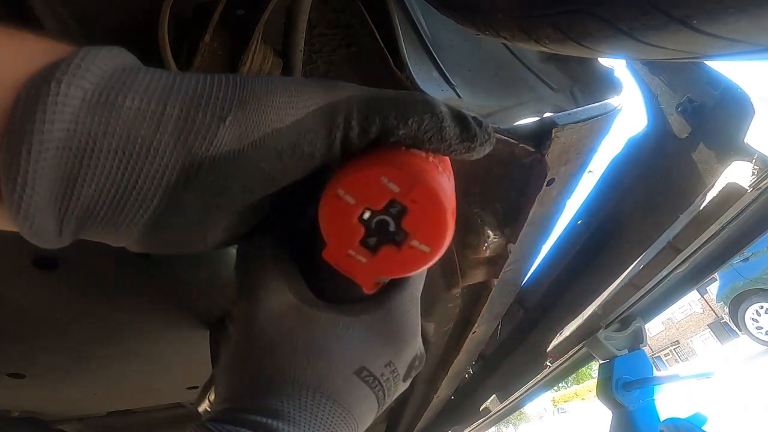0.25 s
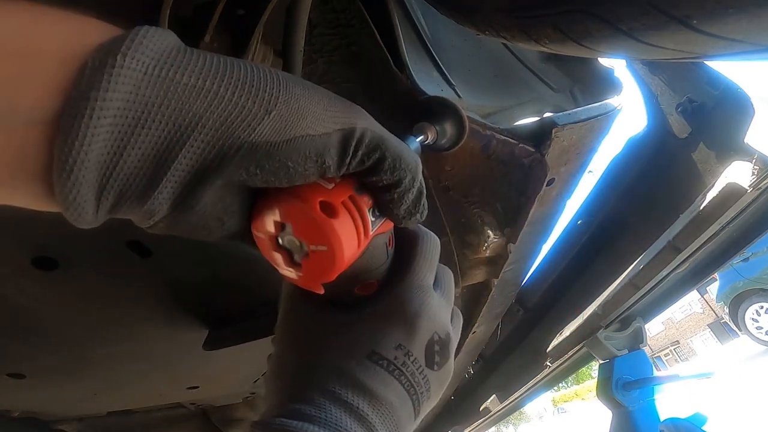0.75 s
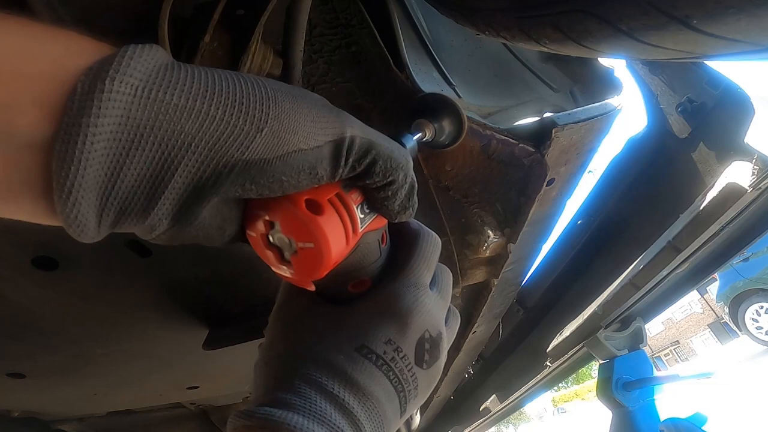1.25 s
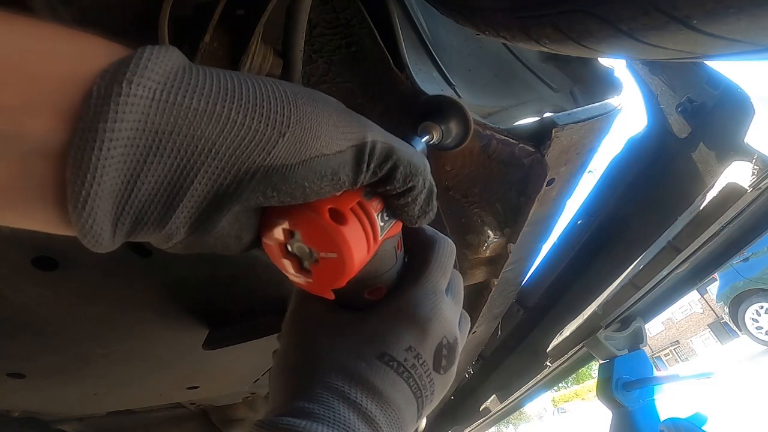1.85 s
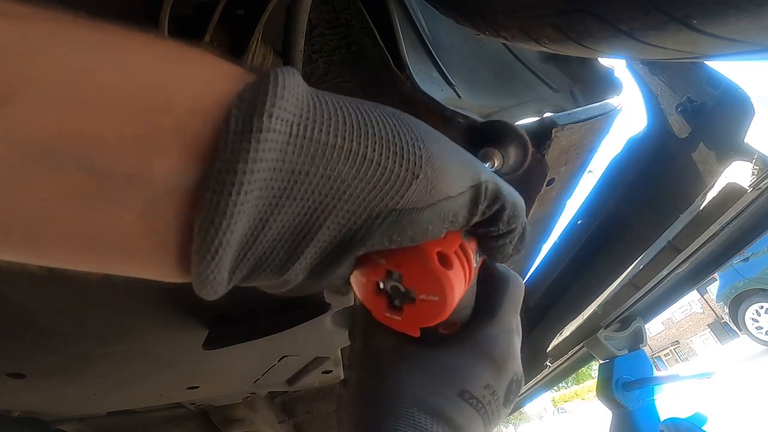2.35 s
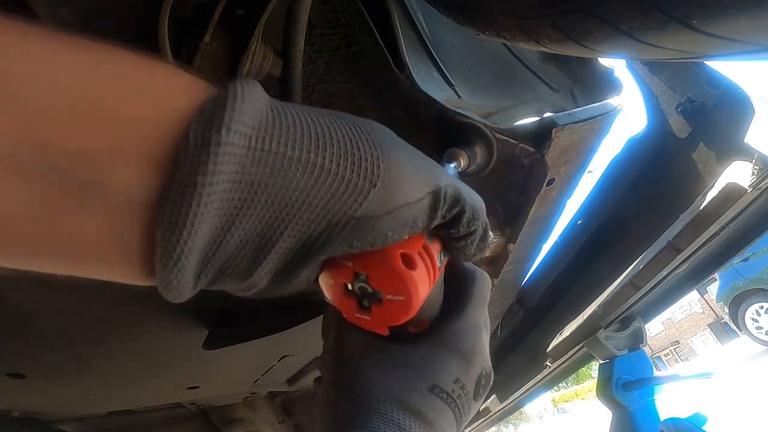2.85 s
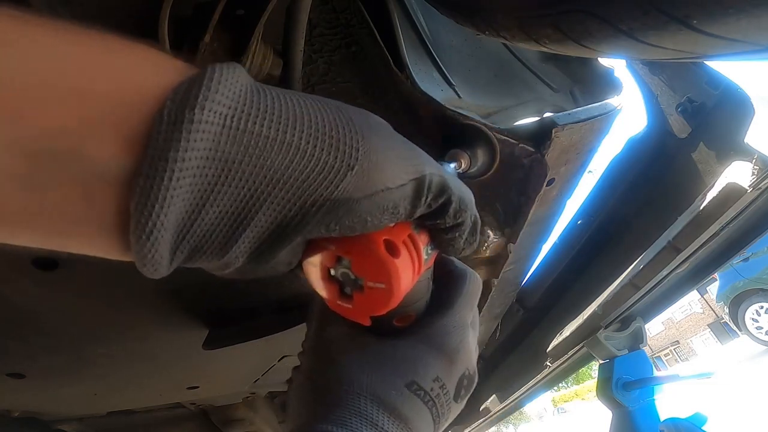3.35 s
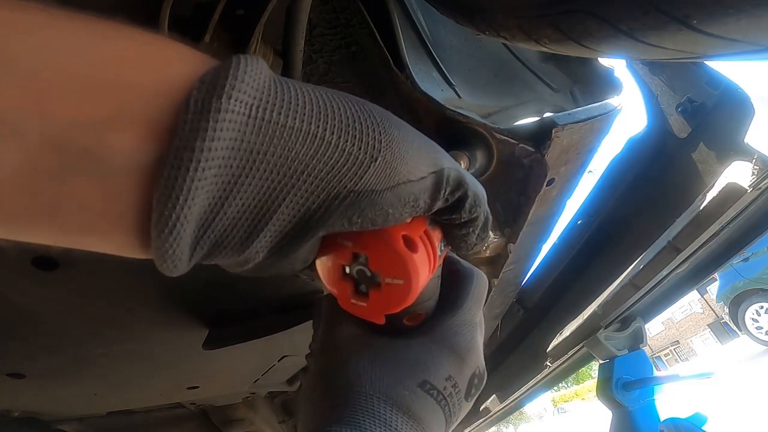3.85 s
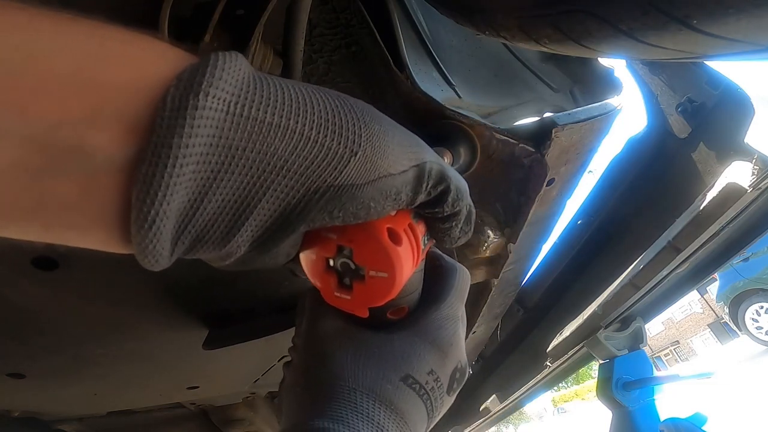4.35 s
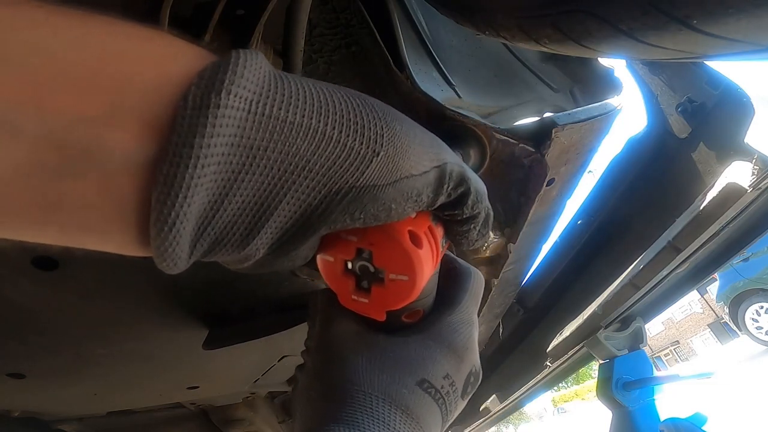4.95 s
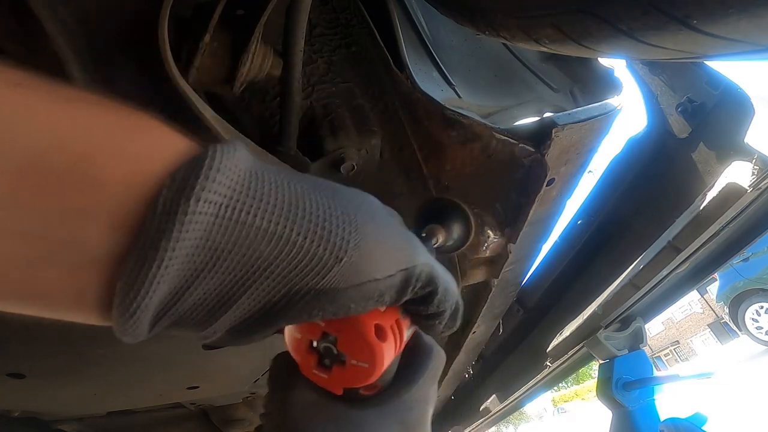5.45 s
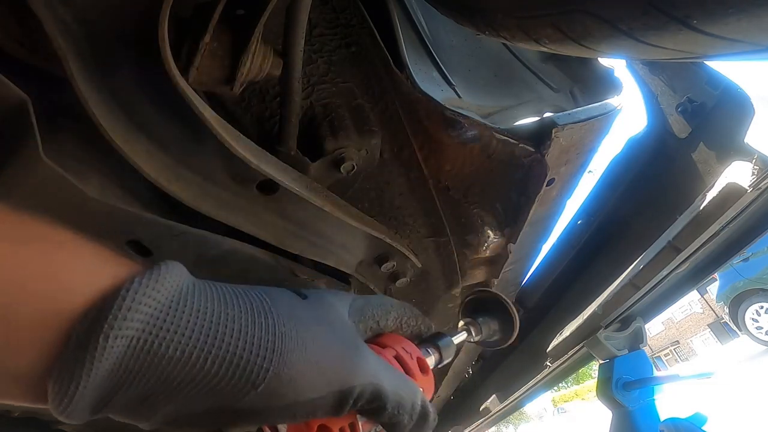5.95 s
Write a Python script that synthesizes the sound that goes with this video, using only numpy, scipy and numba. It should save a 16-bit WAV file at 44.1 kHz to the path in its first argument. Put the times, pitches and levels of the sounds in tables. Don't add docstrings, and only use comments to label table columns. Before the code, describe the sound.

Harsh, nasal buzzing of a handheld grinder on a car's floor pan, recorded very close with a wide stereo microphone. Soft mount bumps at the start, then continuous grinding that wavers, then lurches in rapid labouring dips with short high squeals. The motor cuts, the brake clatters, the pitch drops away, and the tool knocks on steel in a quiet open yard.

```python
import sys
import numpy as np
from scipy import signal
from scipy.fft import rfft, irfft
from scipy.io import wavfile
from scipy.ndimage import uniform_filter1d
from numba import njit

SR = 44100
rng = np.random.default_rng(int(sys.argv[2]) if len(sys.argv) > 2 else 0)


def transcribe(u):
    v = np.clip(np.atleast_2d(u).T, -1, 1)
    q = np.round(v * 32767).astype(np.int16)
    wavfile.write(sys.argv[1], SR, q)


def amplitude_ratio(level_db):
    exponent = np.asarray(level_db, float) / 20
    return 10 ** exponent


N = 273155
HOP = 128


def evened(x):
    return x / np.sqrt(np.mean(abs(x) ** 2) + 1e-20)


def read(points, hz):
    f, value = np.transpose(points)
    return np.interp(np.log(hz + 1), np.log(f + 1), value)


def curves(rows, t):
    s, *columns = np.transpose(rows)
    return [np.interp(t, s, c) for c in columns]


def bumps(t, s, half, faster):
    u = (t[None] - s[:, None]) / half[:, None]
    u = np.where(u < 0, u * faster, u)
    return np.cos(np.pi / 2 * np.clip(u, -1, 1)) ** 2


def slow(shape, size, axis):
    parts = rng.standard_normal((2, *shape))
    for _ in range(2):
        parts = uniform_filter1d(parts, size, axis + 1)
    return evened(parts[0] + 1j * parts[1])


# frequency in Hz, likeness of left and right 0-1.
LIKENESS = [(40, .9), (170, .995), (600, .93), (1300, .9), (2500, .65), (5000, .45), (8000, .4),
            (11000, .1)]
# frequency in Hz, level of left over right in dB.
LEVEL_DIFFERENCE = [(60, -2), (110, 0.5), (200, 0), (380, 1), (700, -6.5), (1290, -0.5), (2380, 4),
                    (4400, 0.5), (6700, -8), (8000, 12.5), (15000, 1.5)]
# frequency in Hz, phase lead of left in radians.
PHASE_LEAD = [(40, .3), (170, .42), (335, .5), (500, -.7), (1000, 0), (1500, -.3), (2700, -1), (5200, -1.5),
              (8300, -2.3), (12000, -1.6)]


def ports(a, b, hz):
    same = np.clip(read(LIKENESS, hz), 0, 1) ** .5
    half = amplitude_ratio(read(LEVEL_DIFFERENCE, hz) / 2) * np.exp(.5j * read(PHASE_LEAD, hz))
    return np.array([a * half, (same * a + np.sqrt(1 - same ** 2) * b) / half])


def noise(spectrum, patchy_db, size=512):
    hz = np.fft.rfftfreq(size, 1 / SR)[:, None]
    a, b, c, d, patches = rng.standard_normal((N * 4 // size + 5, len(hz), 5)).T
    patches = uniform_filter1d(patches, size=size // 100, axis=0)
    patches = evened(uniform_filter1d(patches, size=9000 // size, axis=1))
    z = ports(a + 1j * b, c + 1j * d, hz) * amplitude_ratio(read(spectrum, hz) + patchy_db * patches)
    return evened(signal.istft(z, nperseg=size, noverlap=size * 3 // 4)[1][:, :N])


def ring(hz, width):
    r = np.exp(-np.pi * width / SR)
    x = rng.standard_normal((4, N))
    for _ in range(2):
        x = signal.lfilter([1 - r], [1, -r], x)
    a, b, c, d = x
    carrier = np.exp(2j * np.pi * np.cumsum(hz) / SR)
    return evened((ports(a + 1j * b, c + 1j * d, hz) * carrier).real)


# frequency in Hz, density in dB per Hz.
YARD_SPECTRUM = [(35, -29), (60, -11.5), (95, -25), (260, -45), (750, -61), (1500, -21.5), (2150, -37),
                 (2750, -22.5), (5800, -34), (7700, -35), (8300, -52), (15000, -80)]


def yard():
    return amplitude_ratio(-52) * noise(YARD_SPECTRUM, 2.6, size=2048)


# frequency of a distant machine in Hz, level in dB.
HUM_TONES = [(52, -59)]


def hum():
    t = np.arange(N) / SR
    return sum(amplitude_ratio(db) * ring(hz + 0 * t, 3.1) for hz, db in HUM_TONES)


# start in seconds, level in dB, frequency in Hz, length in seconds.
MOUNT_THUMPS = [
    (0.13, -31, 101, 0.11),
    (0.2, -39, 98.5, 0.21),
    (0.42, -41, 60.6, 0.25),
]


def thumps():
    t = np.arange(N) / SR
    out = np.zeros((2, N))
    for s, db, hz, length in MOUNT_THUMPS:
        swell = np.sin(np.pi * np.clip((t - s) / length, 0, 1)) ** 2
        out += amplitude_ratio(db) * swell * ring(hz + 0 * t, 56)
    return out


def underbody(x, t60=.15):
    taps = rng.choice([-1., 1.], (2, SR // 3)) * (rng.random((2, SR // 3)) < .05)
    tail = taps * amplitude_ratio(-60 * np.arange(SR // 3) / SR / t60)
    return signal.fftconvolve(x, tail / np.linalg.norm(tail, axis=1, keepdims=True), axes=1)[:, :N]


# frequency in Hz, density in dB per Hz.
FAN_SPECTRUM = [(8500, -12), (9300, -9), (10400, -9), (11300, -2), (12100, 0), (14800, -5), (15200, -16),
                (15600, -34)]
# time in seconds, level of the cooling air in dB.
FAN_LEVEL = [(0.0, -50.5), (2.5, -53), (5.2, -50.5), (5.6, -56), (5.8, -76)]


def fan():
    t = np.arange(N) / SR
    level = amplitude_ratio(curves(FAN_LEVEL, t)[0]) * (t < FAN_LEVEL[-1][0])
    waver = amplitude_ratio(1.2 * slow((N,), size=2500, axis=0).real)
    return level * waver * noise(FAN_SPECTRUM, 3, size=1024)


# peak time in seconds, peak level in dB, colour centre in Hz, colour spread in octaves,
# decay time t60 in seconds.
STEEL_TICKS = [
    (5.848, -36, 2820, 0.52, 0.03),
    (5.875, -40, 5490, 0.38, 0.022),
    (5.986, -38, 2990, 0.99, 0.032),
    (5.996, -38, 1990, 0.82, 0.034),
    (6.074, -40, 1700, 0.7, 0.025),
    (6.1453, -11, 3400, 3.3, 0.03),
    (6.15, -29, 4010, 1.26, 0.04),
]
# frequency in Hz, density of struck steel in dB per Hz.
STEEL_SPECTRUM = [(290, -93), (500, -36), (2010, -13.5), (2390, -27), (3150, -7), (3680, -17), (3900, -30),
                  (5050, -7.5), (5510, -23), (6930, -20), (8600, -17.5), (9240, -33), (10700, -30),
                  (15500, -45)]


def ticks():
    size = 4096
    t, hz = np.arange(size) / SR, np.fft.rfftfreq(size, 1 / SR)
    out = np.zeros((2, N + size))
    for s, peak_db, centre_hz, octaves, t60 in STEEL_TICKS:
        a, b = rng.standard_normal((2, size))
        colour_db = np.clip((peak_db + 53) / 25, .3, 1) * read(STEEL_SPECTRUM, hz)
        colour_db -= 6 * (np.log2((hz + 1) / centre_hz) / octaves) ** 2
        tick = irfft(ports(rfft(a), rfft(b), hz) * amplitude_ratio(colour_db))
        tick *= np.clip(t / 0.0028, 0, 1) ** 2 * amplitude_ratio(-60 * t / t60)
        out[:, round((s - .002) * SR):][:, :size] += amplitude_ratio(peak_db) * tick / abs(tick).max()
    return out[:, :N]


# start in seconds, level in dB, length in seconds.
BRAKE_RATTLES = [
    (5.657, -23, 0.02),
    (5.702, -26, 0.0093),
]
# frequency in Hz, density in dB per Hz.
RATTLE_SPECTRUM = [(350, -44), (700, -7.5), (2250, -2), (3160, -11), (4000, -8.5), (6490, -7), (13700, -41),
                   (15500, -42)]


def rattles():
    t = np.arange(N) / SR
    shape = np.zeros(N)
    for s, db, length in BRAKE_RATTLES:
        u = np.clip((t - s) / length, 0, 30)
        shape += amplitude_ratio(db) * 3 * np.sqrt(u) * np.exp(-u ** 2.5)
    return shape * noise(RATTLE_SPECTRUM, 2.5, size=256)


# time in seconds, strongest sideband in dB as the vents turn to and from the microphone.
WHINE_LEVEL = [(0.0, -22), (0.19, -35), (0.7, -24), (0.8, -19), (1.05, -26), (1.18, -47), (1.35, -32),
               (1.7, -32), (2.15, -22), (2.43, -23.5), (3.28, -25.5), (4.48, -26), (4.9, -29.5), (5.2, -33),
               (5.38, -33), (5.55, -23.5)]
# shaft multiple, level in dB, left over right in dB, share of the level curve it follows,
# start in seconds, stop in seconds.
SWITCHING_SIDEBANDS = [
    (-8, -45, -5, .2, .5, 2.4),
    (-4, -34, -2, 1., -1, 5.605),
    (0, -50, 6, .1, .8, 5.3),
    (4, -44, 10, .2, -1, 5.5),
]


def whine(turns):
    switch_hz, upper_fade_db_per_s = 7708, -0.5
    t = np.arange(N) / SR
    swell_db = curves(WHINE_LEVEL, t)[0]
    swell_db = swell_db - swell_db.mean()
    out = np.zeros((2, N))
    for multiple, db, pan_db, follow, start, stop in SWITCHING_SIDEBANDS:
        waver_db = 2.2 * slow((N,), size=2500, axis=0).real
        on = np.clip((t - start) / 0.083, .15, 1) * np.clip((stop - t) / 0.0031, 0, 1)
        phase = 2 * np.pi * (switch_hz * t + multiple * turns) + np.array([[-1.3], [0]])
        turned_db = upper_fade_db_per_s * (t - 0.5) * (multiple > 0)
        sides_db = pan_db * np.array([[.5], [-.5]])
        level = amplitude_ratio(db + follow * swell_db + waver_db + turned_db + sides_db)
        out += on * level * np.sqrt(2) * np.sin(phase)
    return out


# time in seconds, level in dB, frequency in Hz.
BRACKET_BUZZ = [(.8, -44, 3610), (1., -26, 3510), (1.15, -37, 3680), (1.33, -24, 3640), (1.5, -29, 3700),
                (1.7, -29, 3640), (2.1, -34, 3700), (2.4, -45, 3750), (2.6, -31, 3880), (3., -40, 3780),
                (3.4, -29, 3755), (3.7, -34, 3810), (4.2, -33, 3804), (4.6, -29.5, 3763), (4.9, -31, 3793),
                (5.2, -35, 3800), (5.4, -47, 3900)]


def bracket():
    t = np.arange(N) / SR
    db, hz = curves(BRACKET_BUZZ, t)
    patchy_db = 2.6 * slow((N,), size=1500, axis=0).real
    return amplitude_ratio(db + patchy_db) * (t < BRACKET_BUZZ[-1][0]) * ring(hz, 240)


# start in seconds, level in dB, frequency in Hz, length in seconds.
STALL_SQUEALS = [
    (3.166, -16.5, 3900, 0.04),
    (3.56, -21.5, 3840, 0.045),
    (4.042, -33.5, 3986, 0.022),
    (4.168, -27.5, 4030, 0.052),
]


def squeals():
    t = np.arange(N) / SR
    out = np.zeros((2, N))
    for s, db, hz, length in STALL_SQUEALS:
        gate = np.clip(np.minimum(t - s, s + length - t) / 0.009, 0, 1)
        out += amplitude_ratio(db) * gate * ring(hz + 0 * t, 71.6)
    return out


# time in seconds, free shaft speed in Hz while the pad rides lightly.
FREE_SPEED = [(0.0, 157), (0.1, 174.4), (0.4, 171.4), (0.88, 165.3), (1.2, 170.4), (1.45, 166.7),
              (1.87, 170.5), (2.2, 164.7), (2.45, 172.5), (2.83, 170.8), (3.1, 166.6), (3.5, 180.2),
              (4.1, 179.6), (4.5, 204.7), (4.75, 175.1), (5.1, 178.1), (5.34, 195.2), (5.476, 185.3)]
# time in seconds, shaft speed in Hz, fade in dB.
COAST_DOWN = [
    (5.53, 170.9, -1),
    (5.603, 144.8, -1.5),
    (5.657, 124.6, -3.5),
    (5.7, 93.4, -3.5),
    (5.73, 80, -7.5),
    (5.761, 68, -19),
    (5.81, 60, -28),
    (5.95, 53.4, -44),
]
# time in seconds, sag in Hz, recovery in seconds.
LOAD_BITES = [(0.231, 14, 0.13), (0.938, 8, 0.1), (1.088, 12.5, 0.1), (1.31, 13.5, 0.14),
              (1.583, 9.5, 0.094), (1.81, 2.5, 0.054), (1.993, 4.5, 0.091), (2.09, -4, .05),
              (2.585, -3, 0.031), (2.83, -4, 0.073), (3.268, -4, 0.042), (2.358, 7.5, 0.098),
              (2.513, 17.5, 0.057), (2.663, 21.5, 0.097), (2.985, 9, 0.089), (3.189, 32, 0.075),
              (3.341, 19.5, 0.11), (3.435, 15.5, 0.07), (3.587, 49, 0.066), (3.683, 21.5, 0.065),
              (3.809, 31, 0.065), (3.957, 24.5, 0.074), (4.04, 34.5, 0.069), (4.191, 45.5, 0.067),
              (4.296, 33, 0.123), (4.424, 51, 0.11), (4.548, 39, 0.12), (4.657, 30.5, 0.097),
              (4.783, 21, 0.11), (4.898, 13, 0.11), (5.016, 25.5, 0.099), (5.188, 27, 0.16),
              (5.268, 13.5, 0.077), (5.381, 9, 0.044)]


def shaft():
    t = np.arange(N // HOP + 2) * HOP / SR
    s, sag_hz, recovery = np.transpose(LOAD_BITES)
    free_hz = curves(FREE_SPEED + [row[:2] for row in COAST_DOWN], t)[0]
    hz = free_hz - sag_hz @ bumps(t, s, recovery, 1.31)
    hz = uniform_filter1d(np.interp(np.arange(N) / SR, t, hz), size=440)
    return hz, np.cumsum(hz) / SR


# time in seconds, pad pressure in dB, looseness of the grip in dB,
# panel resonance under the pad in Hz, its half width in Hz.
HAND_CONTROL = [(0.0, -3.5, 0, 1163, 150), (0.12, -5, -2, 1350, 151), (0.25, -3.5, 2, 1307, 197),
                (0.33, -3.5, 3, 1255, 130), (0.43, 0, -2, 1285, 200), (0.5, -2, 4, 1185, 250),
                (0.58, 2, -1, 1223, 220), (0.82, -1.5, -6.5, 1350, 280), (0.97, -2.5, 2, 1202, 156),
                (1.23, -0.5, -0.5, 1233, 204), (1.33, -4.5, 2, 1430, 55.2), (1.44, -2, 4, 1170, 111),
                (1.8, -1.06, 3.5, 1188, 92.8), (2.24, 2, 1.5, 1137, 80.8), (2.6, -1.5, 1.6, 1202, 110.3),
                (3.3, -2.35, 1.6, 1207, 192), (5.25, -4.5, 2.6, 1240, 219.4), (5.47, -5.5, -1.5, 1340, 250)]
SHAKE_RULE = (-27, 0.37, 0.93, 0.3566, 0.4)
THUD_RULE = (-34, 2.5, 2.53, -0.0865, 2)
SLAP_RULE = (-22.5, 0.7, 0.08, 0.09, 1.07)
SCOUR_RULE = (-23.5, -0.08, 0.18, 0.0353, 2.5)


def layer_db(rule, t, speed):
    cruise_hz = 168
    db, by_pressure, by_grip, per_hz, by_fade = rule
    pressure_db, grip_db, _, _ = curves(HAND_CONTROL, t)
    load_hz = (speed - cruise_hz) * np.clip((COAST_DOWN[0][0] - t) * 10, 0, 1)
    fade_db = curves(COAST_DOWN, t)[1]
    return db + by_pressure * pressure_db + by_grip * grip_db + per_hz * load_hz + by_fade * fade_db


# time in seconds, judder in dB, share of turns upset 0-1,
# half length in seconds.
SCALE_SNAGS = [(0.0, -53, 0, 0.019), (0.153, -49.5, 0.22, 0.13), (0.208, -61, 0.1, 0.1),
               (0.26, -52, 0.32, 0.048), (0.346, -55.5, 0.01, 0.22), (0.567, -57, 0, 0.05),
               (1.048, -65, 0.43, 0.091), (1.247, -68, 0.04, 0.045), (1.514, -60, 0.46, 0.088),
               (1.882, -57, 0.47, 0.042), (2.116, -64, 0.19, 0.045), (2.636, -65, 0, 0.052),
               (2.956, -58, 0.38, 0.079), (3.176, -56, 0.17, 0.05), (3.583, -59, 0.19, 0.075),
               (3.806, -71, 0.23, 0.055), (4.042, -64, 0.33, .05), (4.179, -58, 0.23, .05),
               (4.393, -65, 0.02, 0.045), (5.286, -64, 0.04, 0.049), (5.7, -54.5, 0.51, 0.078)]
CATCH_FASTER = 3.6


def loose_shares(t, speed):
    s, _, upset, half = np.transpose(SCALE_SNAGS)
    change = abs(np.gradient(speed.ravel(), t.ravel()))
    uneven = .04 + .00008 * change + upset @ bumps(t.ravel(), s, half, CATCH_FASTER)
    uneven = uneven.reshape(t.shape)
    return np.clip(.2 * uneven, 0, .9), np.clip(.07 + 1.1 * uneven, 0, .95)


# frequency in Hz, density in dB per Hz.
JUDDER_SPECTRUM = [(35, -35), (60, -14), (150, 14.5), (250, 2), (450, 3), (900, -12), (9000, -67)]


def judder():
    s, snag_db, _, half = np.transpose(SCALE_SNAGS)
    level = amplitude_ratio(-78) + amplitude_ratio(snag_db) @ bumps(np.arange(N) / SR, s, half, CATCH_FASTER)
    return amplitude_ratio(18.5) * level * noise(JUDDER_SPECTRUM, 1.8, size=1024)


# frequency in Hz, density in dB per Hz.
SCUFF_SPECTRUM = [(200, -16.5), (400, -7), (800, -2), (1200, 14.5), (1500, 9.5), (2000, -13), (9000, -63)]


def scuff(speed):
    t = np.arange(N) / SR
    slap, _ = loose_shares(t, speed)
    return amplitude_ratio(layer_db(SLAP_RULE, t, speed) + 6.5) * np.sqrt(slap) * noise(SCUFF_SPECTRUM, 1.8, size=512)


# frequency in Hz, density in dB per Hz.
GRIT_SPECTRUM = [(900, -31), (1700, -5), (2600, -2.5), (3820, -3), (5500, -7), (6670, -12), (7500, -16),
                 (8850, -20), (9300, -50), (11000, -56)]


def grit(speed, turns):
    t = np.arange(N) / SR
    _, bite = loose_shares(t, speed)
    bursts = evened(1 + 0.55 * np.cos(2 * np.pi * turns) + np.cos(4 * np.pi * turns + 0.73))
    level = amplitude_ratio(layer_db(SCOUR_RULE, t, speed) + 4.5) * np.sqrt(bite)
    return level * bursts * noise(GRIT_SPECTRUM, 2.8, size=256)


# frequency in Hz, level in dB.
BODY_RESPONSE = [(180, 46), (335, -0.5), (490, 7), (670, 2), (850, 2.5), (1180, -4.5), (1400, -6.5),
                 (1880, -8.5), (3520, -2.5), (4280, -5.5), (5910, -9), (7090, -12), (7710, -15),
                 (8500, -64), (11000, -69), (18700, -120)]
# frequency in Hz, half width in Hz, level in dB.
PANEL_MODES = [(1140, 55, 8), (1410, 55, 9), (1680, 80, 5), (2080, 110, 3.5), (2480, 90, 2.5)]
# shaft multiple, level in dB.
FAN_ORDERS = [(16, 4), (20, 0), (22, 1)]


def panel_tone_db(t, hz):
    under_pad_hz, under_pad_width = curves(HAND_CONTROL, t)[2:]
    tone_db = read(BODY_RESPONSE, hz) + 7 / (1 + ((hz - under_pad_hz) / under_pad_width) ** 2)
    for mode_hz, width, db in PANEL_MODES:
        tone_db += db / (1 + ((hz - mode_hz) / width) ** 2)
    coated = np.clip((2.42 - t) * 10, 0, 1)
    tone_db += -3 * coated / (1 + ((hz - 2210) / 330) ** 4)
    for multiple, db in FAN_ORDERS:
        tone_db[:, round(multiple) - 1] += db * np.clip((2.5 - t[:, 0]) / 1.6, .2, 1)
    return tone_db


def slap_pattern(t, hz, k):
    echoes = slow((2, 10000), size=60, axis=1)[:, hz.astype(int)]
    _, bite = loose_shares(t, hz[:, :1])
    travel = np.cumsum(bite / bite.mean() + 1) / 2
    drift = slow((2, len(t) + 2, len(k)), size=17, axis=1)[:, travel.astype(int)]
    loose = np.clip(0.04 + (hz / 3000) ** 1.25, 0, .95)
    spread = np.array([[np.clip((k - 9) / 6, .12, 2)], [2 + 0 * k]])
    sweep = .14 * k ** 2 + spread * rng.random((2, 1, len(k)))
    steady = np.sqrt(1 - loose ** 2) * np.exp(1j * np.pi * sweep)
    return steady + loose * (.62 * drift + .55 * echoes), sweep[0]


# time in seconds, thud change in dB, half length in seconds.
PAD_SKIMS = [(0.025, 18, 0.15), (1.06, -2, 0.036), (1.332, -24.5, 0.1), (1.598, -14, 0.027), (4.2, 0, 0.63),
             (2.36, -1, .06), (2.51, -2, 0.035), (3.34, -1, 0.029), (3.69, 4, 0.034), (3.8, 5, 0.033),
             (4.047, 5, 0.044), (4.67, -2, 0.073), (4.79, -1.5, 0.066), (5.207, -3.5, 0.063)]


def order_gain(t, hz, k, heights):
    speed = hz[:, :1]
    rules = SHAKE_RULE, THUD_RULE, SLAP_RULE, SCOUR_RULE
    shake_db, thud_db, slap_db, scour_db = (layer_db(rule, t, speed) for rule in rules)
    sag = speed / uniform_filter1d(speed, size=60, axis=0) - 1
    under_pad_hz = curves(HAND_CONTROL, t)[2]
    s, skim_db, half = np.transpose(PAD_SKIMS)
    thud_db = thud_db + 75 * sag + 0.1212 * (under_pad_hz - 1200)
    thud_db = thud_db + (skim_db @ bumps(t.ravel(), s, half, 0.92))[:, None]
    slap_db = slap_db + 18 * sag
    shake_db = shake_db + 13.5 * (t < COAST_DOWN[0][0]) / (1 + ((speed - 139) / 15.3) ** 2)

    power = abs(heights.mean(0)) ** 2 / 2

    def share(group):
        return group / np.sqrt((power * group ** 2).sum(1, keepdims=True) + 1e-12)

    above_thud, high = np.clip((hz - 820) / 160, 0, 1), np.clip((hz - 1720) / 160, 0, 1)
    slap, bite = loose_shares(t, speed)
    gain = share(k == 1) * amplitude_ratio(shake_db - 2.75)
    gain += share((1 - above_thud) * (k > 1)) * amplitude_ratio(thud_db)
    gain += share(above_thud - high) * amplitude_ratio(slap_db - 0.13) * np.sqrt(1 - slap)
    gain += share(high) * amplitude_ratio(scour_db + 1.88) * np.sqrt(1 - bite)
    s, _, _, half = np.transpose(PAD_EDGE_RINGS)
    on_edge = bumps(t.ravel(), s, 0.79 * half, 0.82).max(0)[:, None]
    return gain * amplitude_ratio(-6 * on_edge * above_thud * (hz < 1200))


# time in seconds, frequency in Hz, level in dB, half length in seconds.
PATCH_GLINTS = [(0.08, 2150, 11.5, 0.047), (0.316, 1480, 17.5, 0.036), (0.635, 3287, 14, 0.076),
                (0.655, 1554, 8, 0.2), (0.721, 2744, 10.5, 0.2), (0.798, 3274, 10.5, 0.085),
                (0.975, 3340, 11, 0.14), (1.093, 4480, 11, 0.05), (1.127, 3714, 12, 0.075),
                (1.18, 2745, 11, 0.062), (1.32, 4404, 7.1, 0.057), (1.364, 3714, 6, 0.14),
                (1.399, 4565, 9.7, 0.068), (1.452, 3340, 10.5, 0.053), (1.464, 2840, 7.5, 0.073),
                (1.584, 4550, 7, 0.077), (1.646, 3370, 11, 0.06), (1.786, 3300, 16, 0.059),
                (1.941, 3238, 7.7, 0.048), (2.247, 3700, 12.5, 0.069), (2.322, 1916, 13.5, 0.069),
                (2.34, 2186, 9.5, 0.13), (2.42, 1500, 7.6, 0.09), (2.634, 1536, 6.5, 0.1),
                (3.098, 2150, 9, 0.033), (3.111, 2364, 8, 0.041), (3.185, 3900, 10, 0.033),
                (3.265, 2548, 1, 0.038), (3.508, 2916, 10.5, 0.047), (3.584, 3780, -3, 0.076),
                (4.04, 4058, 13.5, 0.047), (4.188, 4027, -2, 0.049), (4.417, 1944, 10, 0.04),
                (4.42, 4204, 9, 0.05), (4.548, 2060, 7.5, 0.042), (4.649, 2027, 10.5, 0.045),
                (4.777, 1982, 11, 0.049), (5.014, 4270, 13, 0.041), (5.186, 2027, 9.5, 0.1),
                (5.233, 3910, 16.5, 0.049), (5.398, 2385, 11, 0.066), (5.43, 1562, 16.5, 0.071),
                (5.44, 2254, 11, 0.054), (5.31, 2650, 13, .03), (5.5, 2300, 5, 0.033),
                (5.43, 3230, 8.5, .05), (5.51, 3157, 12, 0.044), (1.75, 2790, 11, 0.12),
                (3.89, 2430, 5.5, 0.036), (5.57, 1500, 13, 0.065)]
# time in seconds, frequency in Hz, level in dB, half length in seconds.
FLOOR_RINGS = [(0.132, 1356, 12, 0.063), (0.327, 1507, 3, 0.033), (0.412, 1400, 12, 0.088),
               (0.586, 1180, 11.5, 0.16), (0.831, 1300, 8, 0.097), (0.838, 1137, 9.5, 0.048),
               (0.99, 1152, 9.2, 0.047), (1.192, 1367, 7, 0.018), (1.225, 1190, 9.5, 0.035),
               (0.5, 1355, 11, 0.14), (0.73, 1335, 6, 0.12), (1.464, 1160, 10.5, 0.05),
               (1.634, 1160, 11, 0.024), (1.871, 1202, 11.5, 0.15), (2.217, 1150, 14.5, 0.099),
               (2.444, 1217, 14.5, 0.036), (2.519, 1080, 8, 0.029), (2.584, 1170, 14, 0.032),
               (2.666, 1194, 12.5, 0.025), (2.819, 1168, 15, 0.14), (2.971, 1154, 10, 0.023),
               (3.078, 1170, 12, 0.069), (3.27, 1235, 10.5, 0.046), (3.425, 1161, 12, 0.042),
               (3.517, 1110, 7, 0.036), (3.647, 1220, 9.5, 0.033), (3.889, 1105, 5, 0.031),
               (3.998, 1152, 9.5, 0.026), (4.126, 1130, -3, 0.032), (4.253, 1214, 14, 0.022),
               (4.353, 1168, 11.5, 0.035), (4.5, 1190, 12, 0.039), (4.597, 1150, 9.5, 0.039),
               (4.724, 1176, 11.5, 0.027), (4.894, 1162, 9.5, 0.064), (5.096, 1189, 8, 0.043),
               (0.43, 1500, 7.5, 0.11), (0.78, 1635, 8.5, 0.14), (5.333, 1170, 14.5, 0.033),
               (5.338, 1378, 11.0, 0.039), (5.433, 1314, 9, 0.064), (5.445, 1520, 13, 0.048),
               (5.53, 1402, 15.5, 0.031), (5.53, 1506, -2, 0.028), (5.545, 1316, 14, 0.028),
               (5.6, 1480, 15.5, 0.025)]
# time in seconds, frequency in Hz, level in dB, half length in seconds.
PAD_EDGE_RINGS = [(1.055, 1410, 9, .035), (1.332, 1415, 11.5, 0.064), (1.594, 1450, 9.5, 0.045),
                  (3.346, 1420, 12.5, 0.035), (3.69, 1415, 8, .022), (3.96, 1420, 10.5, 0.028),
                  (4.421, 1393, 10.5, 0.044), (4.56, 1420, 11, 0.024), (4.665, 1414, 9, .04),
                  (4.792, 1411, 11, 0.033), (5.018, 1385, 8.5, .04), (5.208, 1444, 11.5, 0.054)]


def lit_orders(t, hz):
    height, share = 0, 0
    floor = FLOOR_RINGS + PAD_EDGE_RINGS
    for rows, base_db, width_hz in ((PATCH_GLINTS, -34.5, 69), (floor, -33, 41)):
        s, patch_hz, db, half = np.transpose(rows)
        swell = bumps(t.ravel(), s, 1.11 * half, 0.97) ** .5
        near = 1 / (1 + ((hz[None] - patch_hz[:, None, None]) / width_hz) ** 4) * swell[:, :, None]
        height = np.maximum(height, (amplitude_ratio(base_db + db)[:, None, None] * near).max(0))
        share = np.maximum(share, near.max(0))
    return height, share


@njit
def play(heights, turns, hop):
    out = np.zeros((2, len(turns)))
    for n in range(len(turns)):
        i, u = n // hop, (n % hop) / hop
        step = np.exp(2j * np.pi * turns[n])
        z = step
        for k in range(heights.shape[2]):
            for c in range(2):
                out[c, n] += (z * ((1 - u) * heights[c, i, k] + u * heights[c, i + 1, k])).real
            z *= step
    return out


def orders(speed, turns, count=50):
    t = np.arange(N // HOP + 2)[:, None] * HOP / SR
    k = np.arange(1, count + 1)
    hz = k * np.interp(t * SR, np.arange(N), speed)
    pattern, sweep = slap_pattern(t, hz, k)
    heights = ports(*pattern, hz) * amplitude_ratio(panel_tone_db(t, hz))
    gain = order_gain(t, hz, k, heights)
    lit, lit_share = lit_orders(t, hz)
    heights = heights * gain * (1 - lit_share) + ports(lit * np.exp(1j * np.pi * sweep), 0 * lit, hz)
    tremble = .0025 * slow((N,), size=330, axis=0).real
    return play(np.ascontiguousarray(heights), turns + tremble, HOP)


def scene():
    speed, turns = shaft()
    background = yard() + hum() + thumps()
    knocks = rattles() + ticks()
    tool = fan() + whine(turns) + bracket() + squeals()
    tool += judder() + scuff(speed) + grit(speed, turns) + orders(speed, turns)
    reflections = amplitude_ratio(-20) * underbody(knocks, t60=0.95) + amplitude_ratio(-25) * underbody(tool, t60=.4)
    return background + reflections + knocks + tool


def low_pass(x):
    return signal.sosfilt(signal.butter(12, 15660, fs=SR, output="sos"), x)


def record(dry):
    return low_pass(dry)


dry = scene()
out = record(dry)
transcribe(out)
```